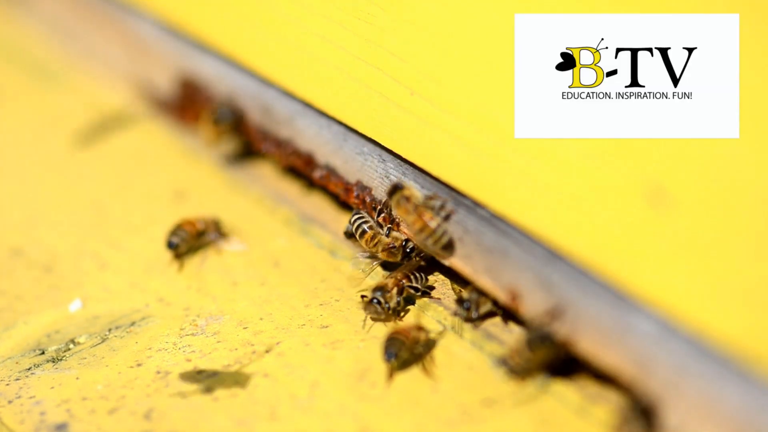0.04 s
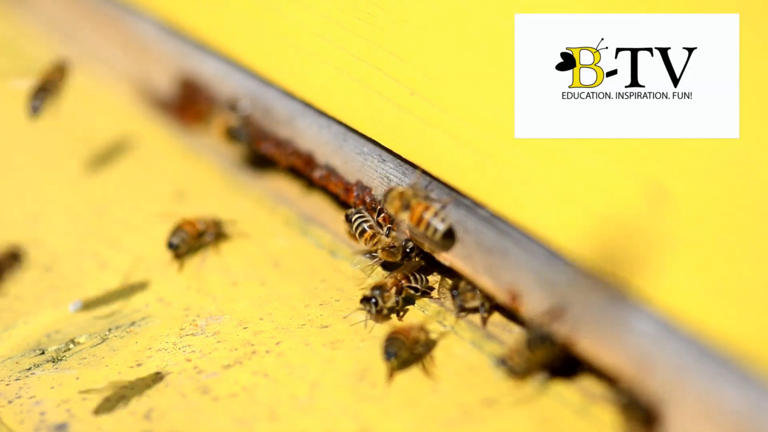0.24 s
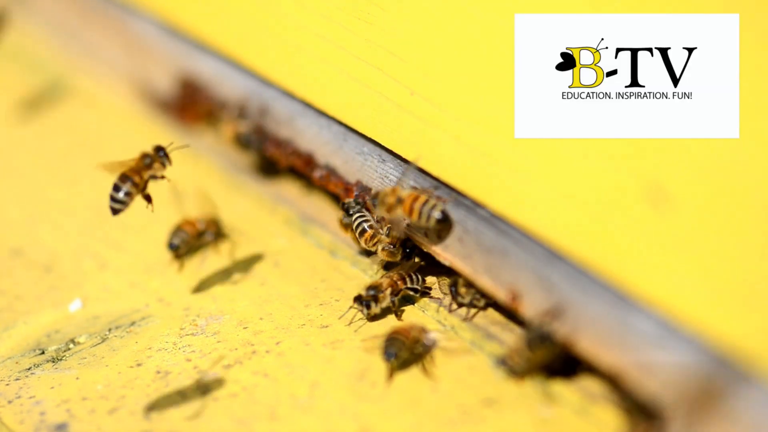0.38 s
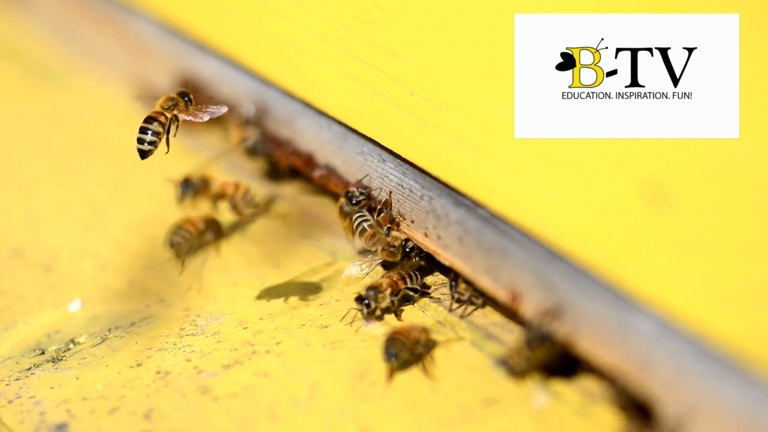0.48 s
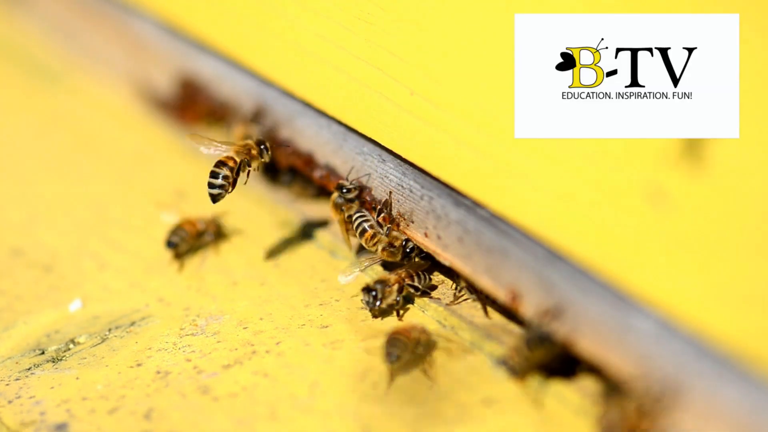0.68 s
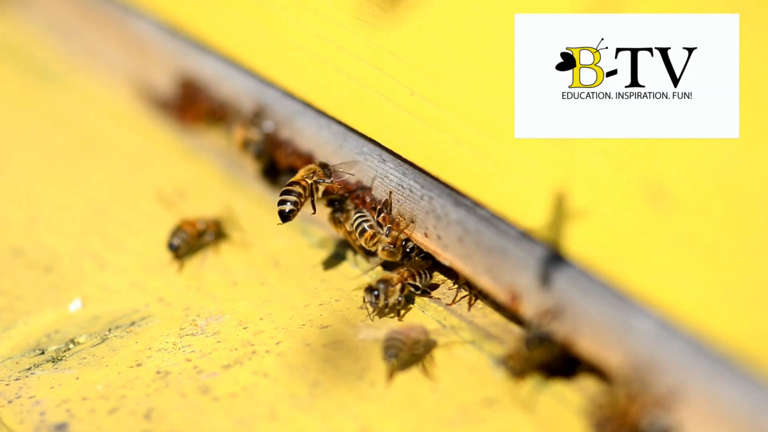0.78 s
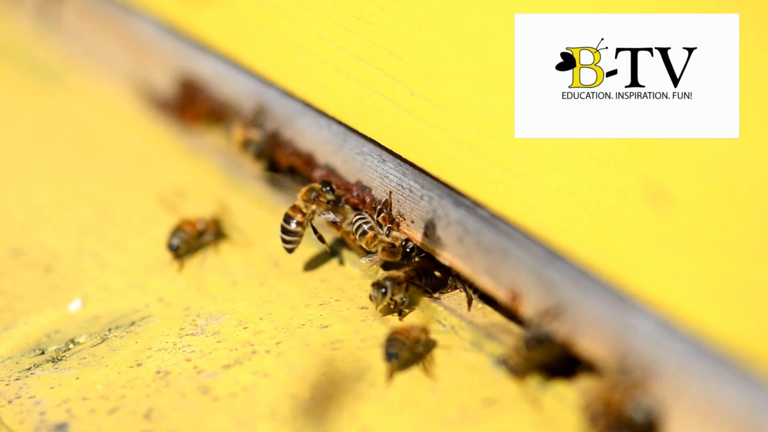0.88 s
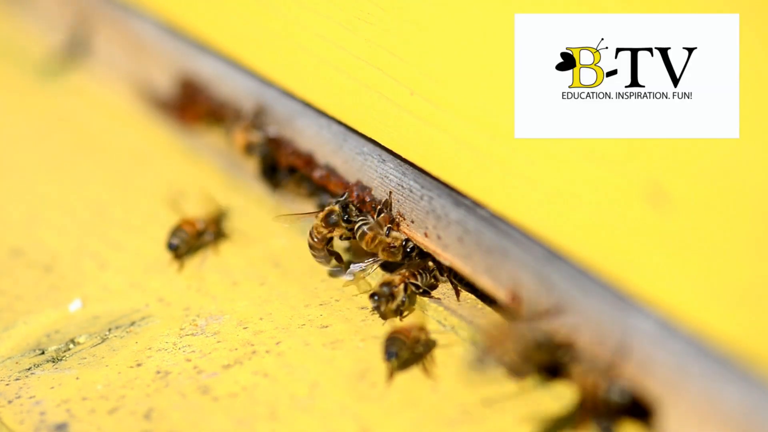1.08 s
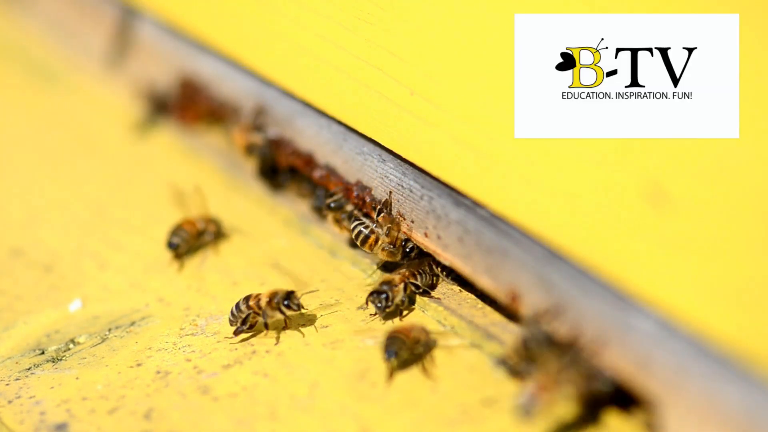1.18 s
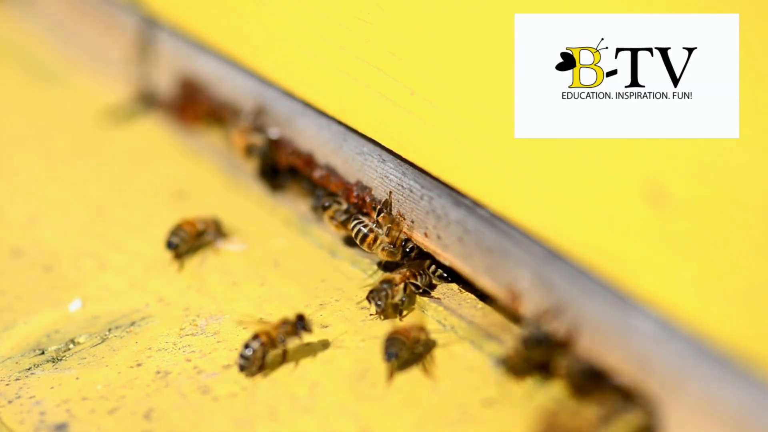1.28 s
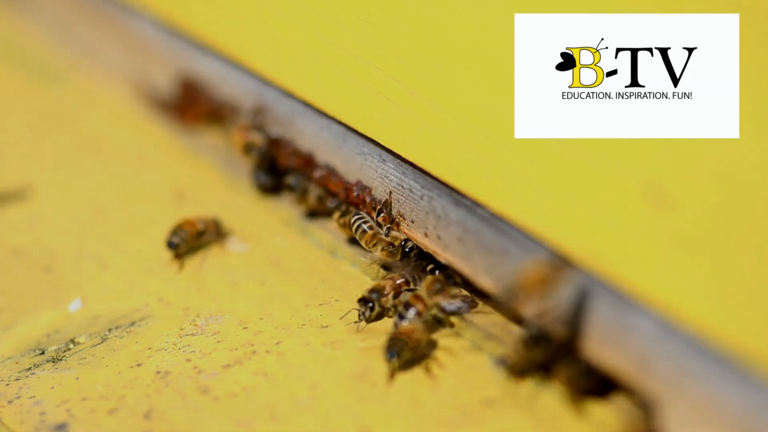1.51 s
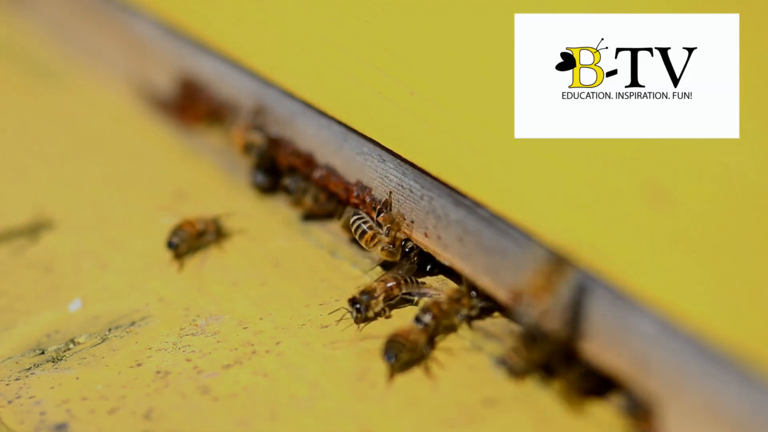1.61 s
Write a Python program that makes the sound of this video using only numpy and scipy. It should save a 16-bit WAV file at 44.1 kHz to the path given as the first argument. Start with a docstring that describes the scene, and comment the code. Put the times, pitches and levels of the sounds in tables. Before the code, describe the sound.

A honeybee buzzes centimetres from a stereo microphone at a hive entrance, its pitch wavering as it darts between right and left. Its wings puff air on the microphone and brush something twice. Other bees hum faintly outdoors.

```python
"""At a hive entrance, a honeybee hovers and darts a few centimetres from a stereo microphone.
Each wingbeat is a pressure pulse and a weaker return stroke, with puffs of hiss. The two lowest
partials are beamed, so they swing between the sides as the bee turns. Its downwash touches the
microphone and its wing tips brush something twice. Further off, other bees hum over faint outdoor hiss."""
import sys
import numpy as np
from scipy import signal
from scipy.fft import rfft, irfft
from scipy.io import wavfile
from scipy.ndimage import uniform_filter1d

SR = 44100
rng = np.random.default_rng(int(sys.argv[2]) if len(sys.argv) > 2 else 0)


def waveform_to_disk(signal):
    """Save audio, clipped to [-1, 1], as 16-bit WAV at the path in sys.argv[1]."""
    frames = np.transpose(np.atleast_2d(signal))
    scaled = np.clip(frames, -1, 1) * 32767
    samples = np.round(scaled).astype(np.int16)
    wavfile.write(sys.argv[1], SR, samples)


N = 72765

# Rasp (partials 3 to 6), louder as the bee nears each side of the microphone: time_s, left_db, right_db
RASP_LEVELS = [(0.0, -47, -46.5), (0.045, -40.3, -39), (0.15, -42.9, -40.5), (0.165, -41.2, -34.5),
               (0.36, -33.5, -33.5), (0.39, -44, -41.3), (0.405, -38.2, -31), (0.45, -40, -37),
               (0.48, -33.5, -27.5), (0.525, -35.5, -33.5), (0.555, -32.5, -22.5), (0.6, -33, -24),
               (0.645, -38, -27.5), (0.735, -33.6, -30), (0.795, -28, -33.5), (0.855, -30, -34),
               (0.9, -31, -30), (1.005, -30, -34), (1.035, -25, -29.0), (1.095, -23.5, -36.5),
               (1.14, -26, -28.5), (1.2, -28.0, -37), (1.215, -26.5, -37), (1.275, -28.5, -35.6),
               (1.29, -35.6, -37), (1.44, -32.8, -40), (1.56, -41, -40), (1.65, -39, -44.5)]
# Reedy edge (partials 7 and up): time_s, level_db
EDGE_LEVELS = [(0.0, -50.4), (0.06, -47.5), (0.12, -48.5), (0.24, -44.9), (0.315, -43.1), (0.36, -46.2),
               (0.375, -53.3), (0.405, -46.5), (0.45, -46.8), (0.495, -41.2), (0.525, -43.4), (0.57, -37.2),
               (0.615, -40.7), (0.675, -41.0), (0.735, -46.1), (0.795, -37.5), (0.87, -46.4), (0.9, -41.3),
               (1.005, -45.0), (1.02, -39.9), (1.095, -39.6), (1.125, -42.5), (1.14, -38.8), (1.185, -47.0),
               (1.215, -38.5), (1.305, -47.3), (1.32, -44.5), (1.5, -44.8), (1.56, -49.1), (1.65, -46.4)]
JITTER_HZ = 200  # rate of the flutter from one wingbeat to the next


def undb(db):
    """Decibels to gain."""
    return 10 ** (np.asarray(db) / 20)


def unit(x):
    """Scale to rms 1."""
    return x / np.sqrt(np.mean(x ** 2))


def curves(table):
    """The columns of a timed table at every sample, corners rounded."""
    times, *columns = np.array(table, float).T
    lines = [np.interp(np.arange(N) / SR, times, column) for column in columns]
    return uniform_filter1d(np.array(lines), size=350, axis=1)


def colour(hz, points):
    """Gain of a spectrum at the given frequencies."""
    freq_hz, gain_db = np.array(points, float).T
    return undb(np.interp(np.log(hz + 1), np.log(freq_hz), gain_db))


def walk(rate_hz):
    """Smooth random wander with rms 1."""
    hold = max(int(SR / rate_hz), 2)
    steps = rng.permutation(rng.standard_normal(2048))[:N // hold + 1]
    return unit(uniform_filter1d(np.repeat(steps, hold), hold)[:N])


def noise(shape, likeness):
    """Stereo noise at rms 1, with spectrum shape(hz) and a given correlation of the sides."""
    hz = np.arange(N // 2 + 1) * SR / N
    mid, side = irfft(rfft(rng.standard_normal((2, N))) * shape(hz), N)
    return unit(np.sqrt(1 + likeness) * mid + np.sqrt(1 - likeness) * side * np.array([[1], [-1]]))


def swells(table):
    """Left and right gain of bell-shaped swells."""
    t = np.arange(N) / SR
    return sum(undb([[left_db], [right_db]]) * np.exp(-.5 * ((t - centre_s) / width_s) ** 2)
               for centre_s, width_s, left_db, right_db in table)


def outdoors():
    """Open air around the hive: steady hiss and a thin treble band that swells and fades."""
    # Spectrum of the steady hiss: freq_hz, gain_db
    hiss_colour = [(20, 7), (60, 2), (150, 1), (500, 0), (1000, -1), (2500, -9), (6000, -10), (11000, -12),
                   (15500, -20)]
    # Swell of the treble band: time_s, level_db
    band_levels = [(0, -57), (.1, -61), (.2, -51), (.33, -59), (.48, -50), (.62, -58), (.8, -53.5),
                   (1.1, -58), (1.4, -54), (1.65, -53.5)]
    centre_hz, half_width_hz = 4740, 300
    band = noise(lambda hz: 1 / (1 + ((hz - centre_hz) / half_width_hz) ** 2), likeness=0.78)
    hiss = undb(-47) * noise(lambda hz: colour(hz, hiss_colour), likeness=.6)
    return hiss + band * undb(curves(band_levels))


def far_bees():
    """Two bees further from the microphone drift in pitch, level and direction."""
    # Average hum of each bee: pitch_hz, level_db
    bees = [(228.4, -49.5), (197.6, -63.5)]
    out = 0
    for pitch_hz, level_db in bees:
        phase = 2 * np.pi * np.cumsum(pitch_hz * (1 + .025 * walk(7))) / SR
        buzz = unit(sum(np.cos(k * phase) / k for k in range(1, 12)))
        drift_db = 2 * walk(5.836)
        pan_db = walk(2.2) * np.array([[1], [-1]])
        out = out + buzz * undb(level_db + drift_db + pan_db)
    return out


def downwash():
    """Air pushed down by the close bee's wings rumbles on the microphone."""
    # Gusts on the microphone: centre_s, width_s, left_db, right_db
    gusts = [(.57, 0.021, -36, -29.5), (.84, 0.034, -50, -56), (1.06, 0.027, -40, -42),
             (1.16, 0.029, -43, -52)]
    # Spectrum of the rumble: freq_hz, gain_db
    rumble_colour = [(20, -11), (40, 3), (80, -4.5), (160, -4), (400, -16), (1200, -56)]
    return swells(gusts) * noise(lambda hz: colour(hz, rumble_colour), likeness=-0.0081)


def wing_brushes():
    """The wing tips brush something: two very short scuffs."""
    # Touches of the wing tips: centre_s, width_s, left_db, right_db
    touches = [(1.137, .005, -29, -33), (1.21, .006, -34, -37)]
    # Spectrum of a scuff: freq_hz, gain_db
    scuff_colour = [(200, 8), (800, 11), (1500, 6), (3000, -13), (9000, -8), (15000, -55)]
    return swells(touches) * noise(lambda hz: colour(hz, scuff_colour), likeness=0.62)


def wing_air(phase):
    """Air torn by the wings hisses in a puff on each stroke and, more weakly, on the way back."""
    # Spectrum of the torn air: freq_hz, gain_db
    air_colour = [(250, 4), (600, 4), (1200, 2), (2000, -3), (3200, -5.5), (5500, -4.5), (8000, -4),
                  (11000, -5), (13500, -9), (15500, -20)]
    sharpness, depth, return_share = 4., 1.9, .4
    puffs = np.exp(sharpness * (np.cos(phase) - 1))
    puffs += return_share * np.exp(sharpness * (-np.cos(phase) - 1))
    pulsing = unit(1 + depth * puffs * undb(2.0 * walk(JITTER_HZ)))
    # The hiss follows part of the rasp's level, the edge's level and the rasp's pan.
    near_db = curves(RASP_LEVELS)
    middle_db = near_db.mean(axis=0)
    level_db = -39 + 0.33 * (middle_db + 28.5) + 0.61 * (curves(EDGE_LEVELS) + 39)
    pan_db = .25 * (near_db - middle_db)
    return pulsing * noise(lambda hz: colour(hz, air_colour), likeness=0.01) * undb(level_db + pan_db)


def wing_tone(phase, mean_beat_hz):
    """Pressure pulses of the wingbeat: two beamed partials under a rasp with a reedy edge."""
    # Two lowest partials, before trim: time_s, first_left_db, first_right_db, second_left_db,
    # second_right_db
    hum_levels = [(0.0, -42, -44.5, -49, -49.5), (0.075, -34, -39, -55.5, -49),
                  (0.24, -40, -29, -35.5, -31.5), (0.285, -27.5, -34, -42, -34),
                  (0.36, -26, -31.5, -40, -33), (0.375, -36, -29.5, -49, -37), (0.42, -36, -19, -40, -36),
                  (0.51, -19, -32, -38, -23), (0.54, -24.5, -13, -37, -40), (0.6, -21.5, -12, -26.5, -21),
                  (0.645, -36, -17, -37.5, -21.5), (0.705, -36, -21.5, -21.5, -24),
                  (0.735, -26.5, -20.5, -46, -33.5), (0.765, -15.5, -30, -27, -30),
                  (0.855, -19, -25, -32, -39), (0.9, -26, -24.5, -29, -32), (1.035, -16.5, -25.5, -40, -30),
                  (1.05, -11, -25, -41, -50), (1.125, -14, -24, -34.5, -25.5),
                  (1.155, -22.5, -17, -31.5, -47), (1.23, -13, -32.5, -28.5, -35),
                  (1.305, -28.5, -24.5, -38, -43.5), (1.365, -25.5, -27, -41, -49),
                  (1.44, -22.5, -37, -32, -42.5), (1.53, -35.5, -30.5, -48, -49.5),
                  (1.65, -30, -36, -40.5, -42)]
    # Balance of the partials within rasp and edge: freq_hz, gain_db
    partial_colour = [(640, 0), (855, -5), (1070, -5.5), (1290, -11.5), (1500, -16), (1720, -17),
                      (2140, -18.5), (2450, -26), (3000, -30), (3600, -36), (6000, -42)]
    first_trim_db, second_trim_db, rasp_trim_db, edge_trim_db = -1, 4.5, 0.5, -1
    skew_rad = 1  # lean of the pulse
    rest_lag_rad, turn_lag_rad, octave_lag_rad, scatter_rad = 0.36, 0.91, 2.36, 0.9  # between the sides
    wander_hz, return_drift_hz = 18.02, 6.084

    hum_db = curves(hum_levels)
    sides = np.array([[.5], [-.5]])
    turn = np.tanh((hum_db[0] - hum_db[1]) / 6.5)  # +1 beamed left, -1 beamed right
    side_lag = sides * (rest_lag_rad + turn_lag_rad * turn)
    octave_lag = sides * octave_lag_rad * turn
    first = undb(hum_db[:2] + first_trim_db) * np.cos(phase + skew_rad - side_lag)
    second = undb(hum_db[2:] + second_trim_db) * np.cos(2 * phase + skew_rad + octave_lag)
    out = first + second

    near_db = curves(RASP_LEVELS)
    rasp_db = near_db + rasp_trim_db
    edge_db = curves(EDGE_LEVELS) + edge_trim_db + 0.33 * (near_db - near_db.mean(axis=0))
    # The return stroke comes about 0.41 of a cycle after the main pulse.
    return_rad = 2 * np.pi * (0.41 + 0.016 * np.array([walk(return_drift_hz), walk(return_drift_hz)]))
    for orders, band_db in (np.arange(3, 7), rasp_db), (np.arange(7, 26), edge_db):
        gains = colour(orders * mean_beat_hz, partial_colour)
        level = undb(band_db + 0.33 * walk(JITTER_HZ)) / np.sqrt(np.sum(gains ** 2))
        for k, gain in zip(orders, gains):
            wander_db = 1.1 * np.array([walk(wander_hz), walk(wander_hz)])
            side_shift = sides * scatter_rad * walk(wander_hz) - 0.82 * side_lag * (3 / k) ** 2
            treble_lag = 1.16 * (k / 10) ** 3  # high partials trail the stroke
            angle = k * phase + skew_rad + side_shift - treble_lag
            return_share = .45 * min(k / 8, 1) ** 2
            strokes = np.cos(angle) + return_share * np.cos(angle - k * return_rad)
            out = out + gain * level * undb(wander_db) * strokes / np.hypot(1, return_share)
    return np.sqrt(2) * out


def near_bee():
    """The bee centimetres from the microphone: one unsteady wingbeat drives both tone and hiss."""
    # Wingbeat rate, sagging in each turn: time_s, pitch_hz
    wingbeat = [(0.0, 208.9), (0.06, 224.7), (0.09, 217.3), (0.12, 196.7), (0.165, 218), (0.21, 210.9),
                (0.225, 216.7), (0.315, 216.3), (0.345, 213.9), (0.39, 175.9), (0.405, 206.9),
                (0.45, 192.6), (0.465, 202.7), (0.51, 211.5), (0.525, 182.1), (0.54, 225.3), (0.585, 222.3),
                (0.645, 200.7), (0.675, 214.7), (0.72, 211.5), (0.735, 202.4), (0.75, 214.4), (0.825, 225),
                (0.855, 204.1), (0.9, 217.4), (0.945, 214.5), (0.99, 200.1), (1.005, 198.4), (1.035, 220.4),
                (1.125, 199.2), (1.155, 220.3), (1.185, 198.4), (1.2, 193.6), (1.215, 222.8),
                (1.305, 197.8), (1.335, 225.7), (1.395, 216), (1.53, 217.5), (1.62, 209.9), (1.65, 218.6)]
    beat_hz = curves(wingbeat)[0]
    unsteadiness = 1 + .0025 * walk(JITTER_HZ) + .0035 * walk(rate_hz=50)
    phase = 2 * np.pi * np.cumsum(beat_hz * unsteadiness) / SR
    return downwash() + wing_brushes() + wing_tone(phase, beat_hz.mean()) + wing_air(phase)


def scene():
    """The close bee at the entrance, with other bees and the open air behind it."""
    return near_bee() + far_bees() + outdoors()


def record(dry):
    """The recorder cuts the top treble steeply."""
    cutoff_hz = 14900
    return signal.sosfilt(signal.ellip(8, .2, 80, cutoff_hz, fs=SR, output="sos"), dry)


dry = scene()
out = record(dry)
waveform_to_disk(out)
```